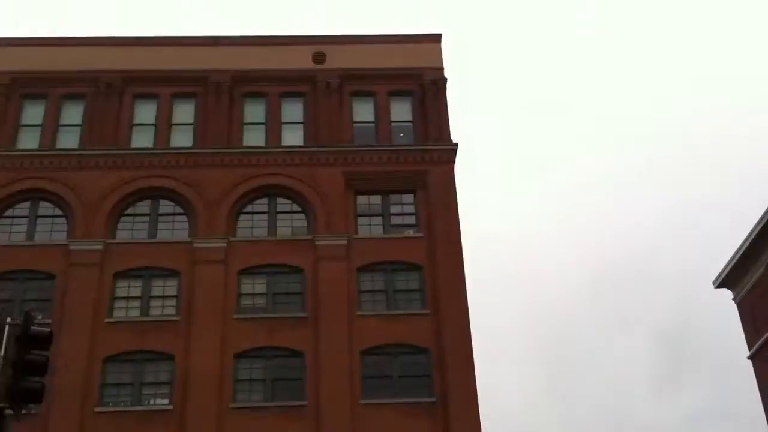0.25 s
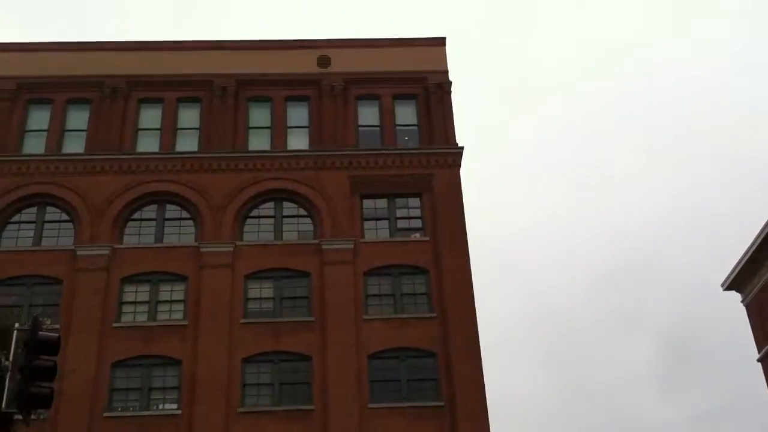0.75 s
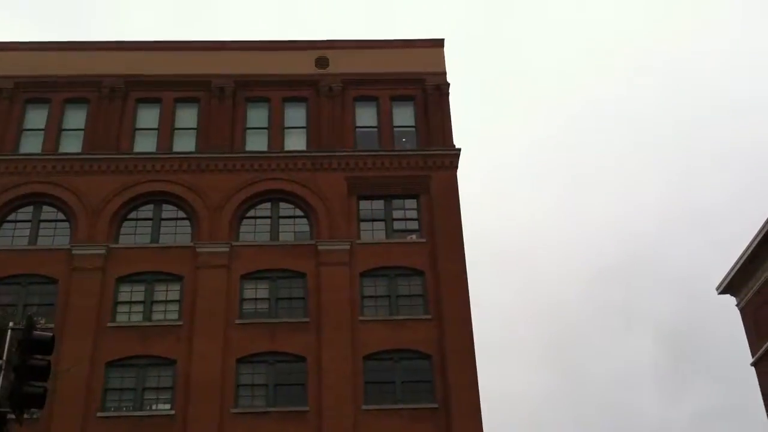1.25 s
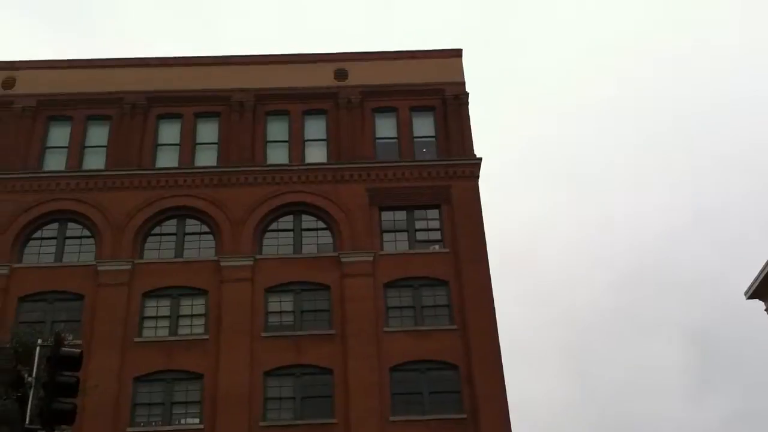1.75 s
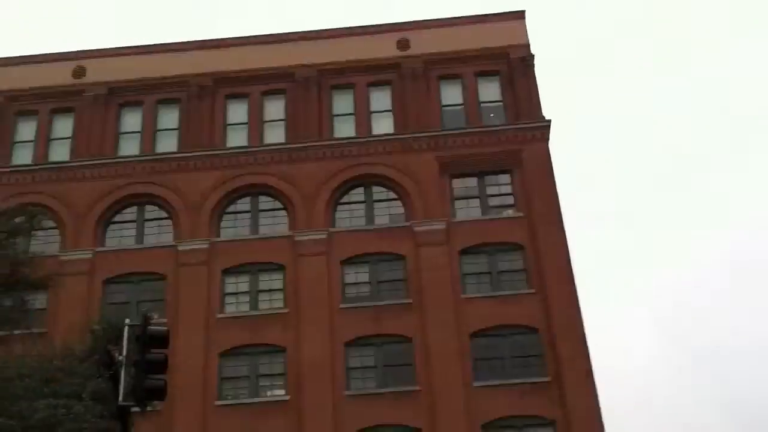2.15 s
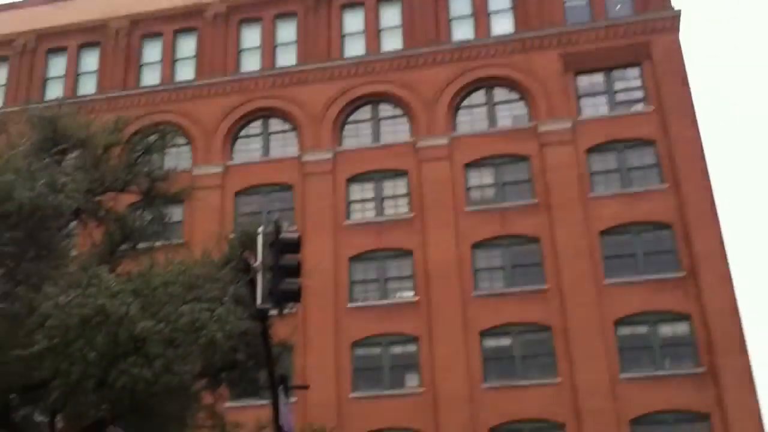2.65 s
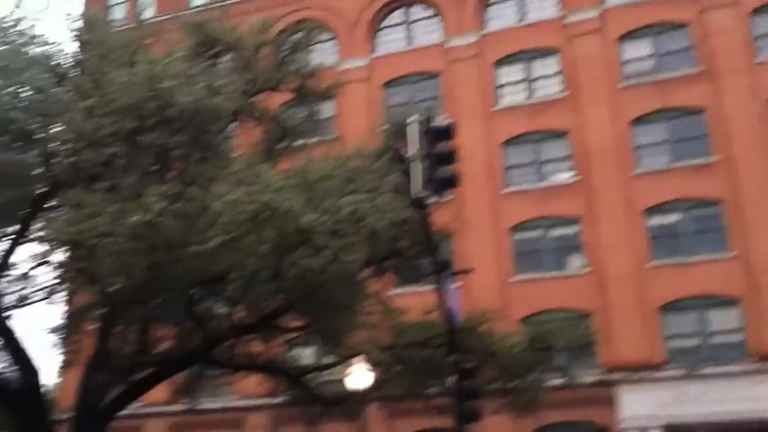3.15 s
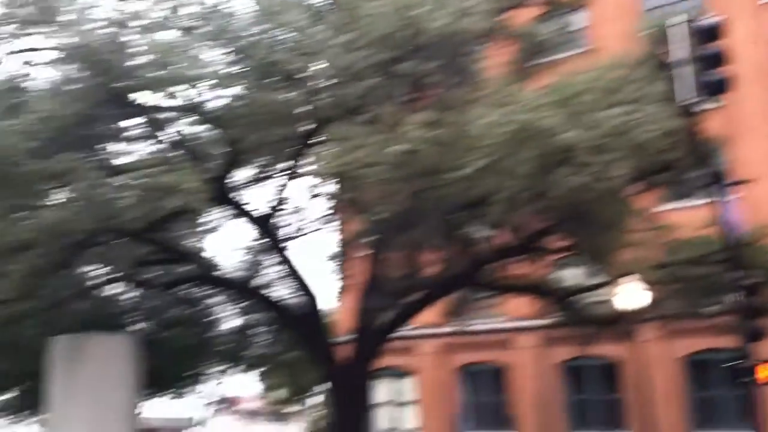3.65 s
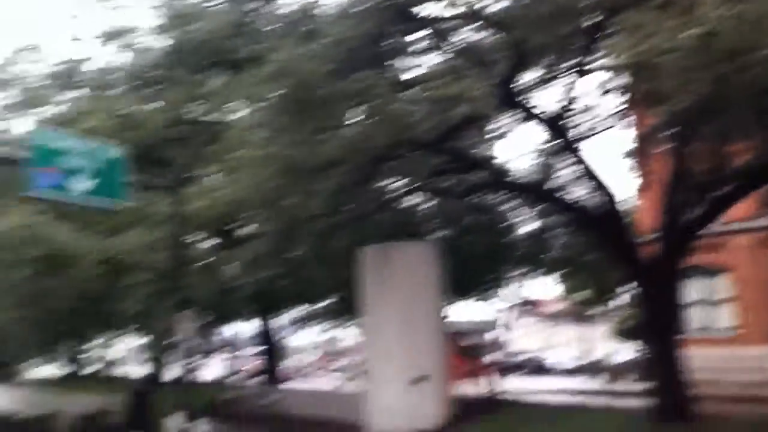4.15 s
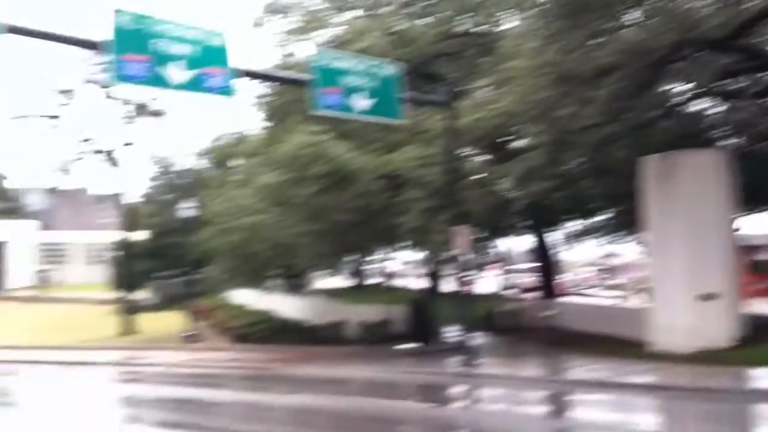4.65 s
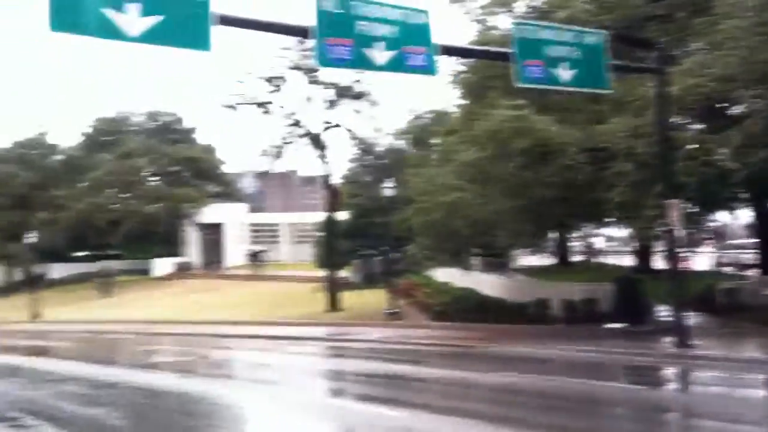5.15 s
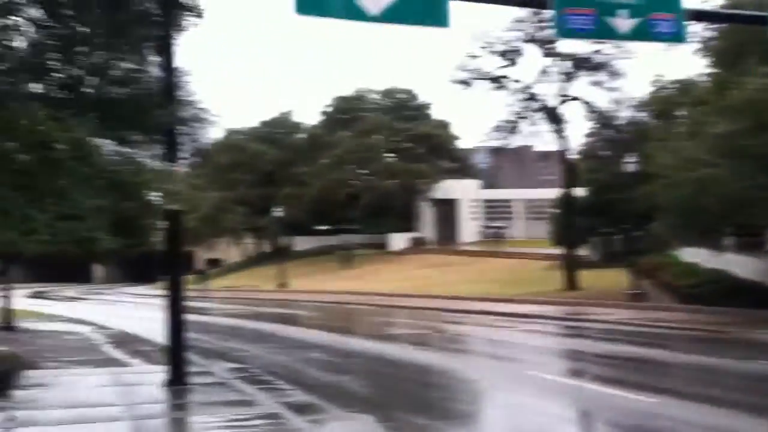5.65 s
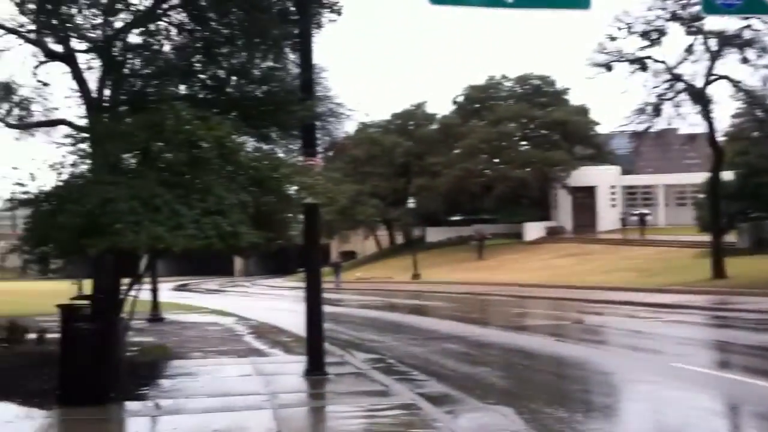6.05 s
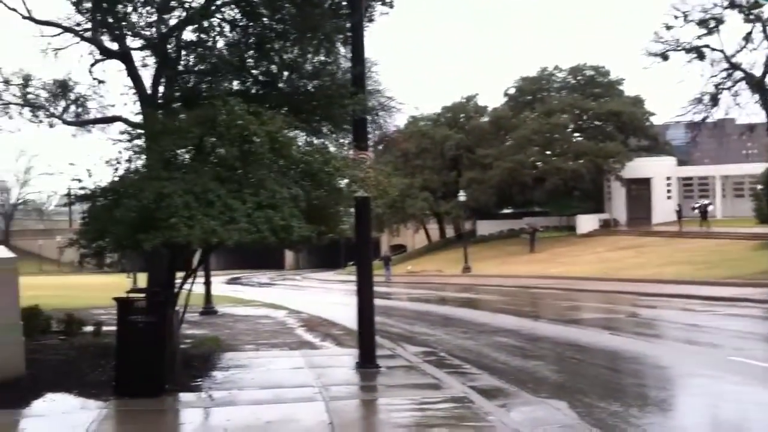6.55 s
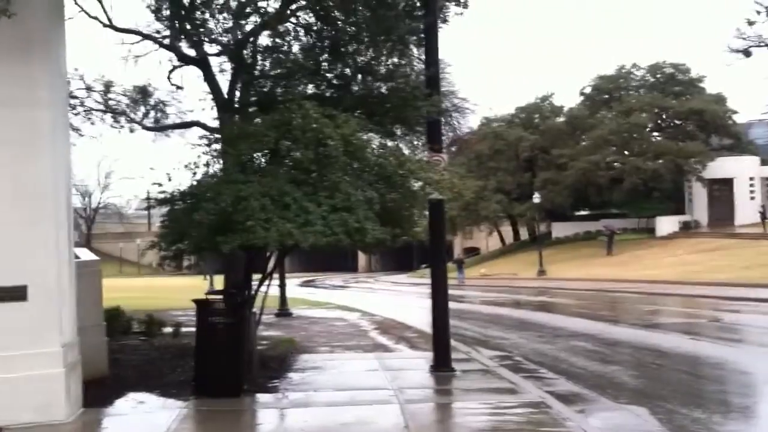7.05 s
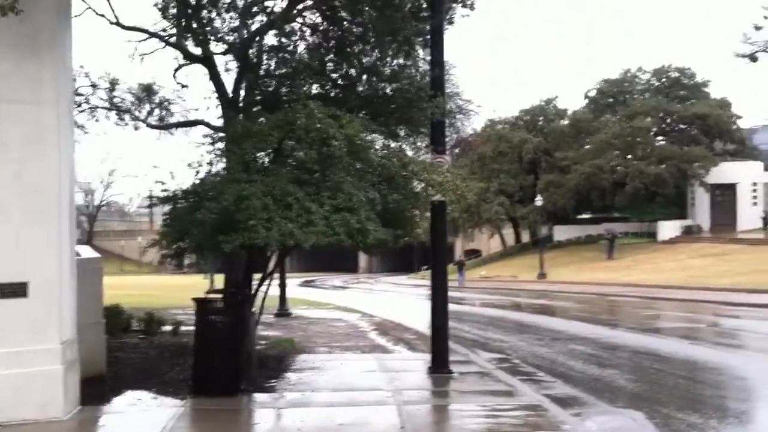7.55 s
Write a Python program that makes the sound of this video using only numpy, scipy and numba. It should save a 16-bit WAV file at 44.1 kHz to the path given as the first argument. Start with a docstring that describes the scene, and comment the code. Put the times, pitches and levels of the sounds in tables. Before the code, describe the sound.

A short loud thump and rush cut off dead, then steady wet-street traffic hisses, splashes grow, and a faint distant horn sounds near the end.

```python
"""A rain-wet city street, heard from the pavement after a short loud thump and rush that stop dead.
Engines rumble as low shaped noise; tyres roar, their tread notes sing, and the water film sizzles.
Spray, made of noise and tiny impacts, grows louder and brighter halfway, with small splashes.
A car draws nearer towards the end, and two horns, nearly pure tones, sound faintly far off."""
import sys
import numpy as np
from scipy import signal
from scipy.fft import rfft, irfft
from scipy.io import wavfile
from scipy.ndimage import uniform_filter1d
from numba import njit

SR = 44100
rng = np.random.default_rng(int(sys.argv[2]) if len(sys.argv) > 2 else 0)


def int16_out(signal):
    """Quantize to a 16-bit WAV file."""
    q = np.round(np.clip(np.atleast_2d(signal).T, -1, 1) * 32767)
    wavfile.write(sys.argv[1], SR, q.astype(np.int16))


N = 344421
TIME = np.arange(N) / SR  # seconds


def undb(db):
    """Decibels to gain."""
    return 10 ** (np.asarray(db) / 20)


def unit(x):
    """Scale to rms 1."""
    return x / np.sqrt(np.mean(x ** 2))


def curves(table):
    """The columns of a table, after its times, as controls with one value a sample."""
    s, *columns = np.transpose(table)
    return [np.interp(TIME, s, column) for column in columns]


def colour(x, spectrum):
    """Shape a sound with a spectrum that falls a steady 20 dB an octave beyond its ends; rms 1."""
    hz, db = np.transpose(spectrum)
    octave = np.log2(np.arange(N // 2 + 1) * SR / N + 1)
    points = np.log2(hz)
    outside = np.abs(octave - np.clip(octave, points[0], points[-1]))
    gain = undb(np.interp(octave, points, db) - 20 * outside)
    return unit(irfft(rfft(x) * gain, N))


def noise():
    """White noise."""
    return rng.standard_normal(N)


def walk(rate):
    """Random levels held 1 / rate s and smoothed; rms 1."""
    hold = int(SR / rate)
    steps = np.repeat(rng.standard_normal(N // hold + 1), hold)[:N]
    return unit(uniform_filter1d(steps, hold))


def droplets(per_s, spread_db):
    """Tiny impacts at random moments, most small and a few large; rms 1."""
    size = undb(spread_db * np.minimum(rng.exponential(size=N), 5))
    hit = rng.random(N) < per_s / SR
    return unit(hit * size * np.sign(noise()))


@njit
def resonance(x, hz, width):
    """State-variable band-pass whose centre moves."""
    y, band, low = np.empty(len(x)), 0., 0.
    for i in range(len(x)):
        g, k = np.tan(np.pi * hz[i] / SR), width / hz[i]
        v = (band + g * (x[i] - low)) / (1 + g * (g + k))
        band, low, y[i] = 2 * v - band, low + 2 * g * v, k * v
    return y


def tyres():
    """Rolling tyres roar; air pumped through the tread grooves rings in broad notes that wander apart."""
    # The stream of cars, slowly drawing nearer. Each row: time in seconds, roar in dB, tread note in dB.
    traffic = [(.15, -33, -38.5), (1.3, -33, -40), (1.9, -33.5, -36.5), (2.8, -32.5, -35), (3.1, -32, -38),
               (3.4, -33.5, -34.5), (3.85, -31.5, -35.8), (4.2, -32.2, -36.5), (4.7, -32, -37),
               (5.3, -32.5, -34.5), (5.9, -31.5, -34.5), (6.4, -32, -34), (7.35, -31.5, -36),
               (7.55, -31, -33.5), (7.73, -30, -32), (7.8, -30.5, -34)]
    # Spectrum of the roar. Each row: frequency in Hz, relative level in dB per Hz.
    roar_spectrum = [(200, -9), (380, -6.5), (550, -3), (780, 0), (1100, -1.5), (1550, -2.5), (2100, 0),
                     (2750, -5.5), (3200, -11), (4200, -42)]
    # The tread note, sinking overall. Each row: time in seconds, centre in Hz.
    tread_pitch = [(1.7, 2410), (4.0, 2170), (5.4, 2224), (7.8, 2190)]
    # Tyres of different sizes. Each row: share of the centre pitch, relative level in dB.
    tread_voices = [(.93, -5), (1, -4.5), (1.08, -5.5)]
    width_hz, wander_share, flicker_db = 570.0, .035, 1.6
    air_hz = 8500  # the tread note dies away above this

    roar_db, tread_db = curves(traffic)
    centre_hz = curves(tread_pitch)[0]
    roar = colour(noise(), roar_spectrum) * undb(roar_db + 0.35 * walk(18))
    air_filter = signal.butter(4, air_hz, fs=SR, output="sos")
    grooves = np.zeros(N)
    for share, db in tread_voices:
        hz = share * centre_hz * (1 + wander_share * walk(9))
        pumping = signal.sosfilt(air_filter, noise())
        note = resonance(resonance(pumping, hz, width_hz), hz, width_hz)
        grooves += unit(note) * undb(db + flicker_db * walk(13))
    return roar + grooves * undb(tread_db + tread_swells() + 0.34 * walk(20))


def tread_swells():
    """The tread note swells as single cars pass; dB."""
    # Each row: moment in seconds, swell in dB, half length in seconds (to 1/e of the swell).
    passes = [(.38, 2, .04), (.93, 4, 0.06), (1.09, 5, 0.066), (2.72, 0, 0.15), (3.998, 3.7, 0.071),
              (4.975, 3.5, 0.037), (5.39, 2, 0.09), (6.216, 2.5, 0.085), (6.683, 4, 0.069),
              (7.158, 3, .045), (7.73, 1.5, .06)]
    return sum(db * np.exp(-((TIME - s) / half) ** 2) for s, db, half in passes)


def engines():
    """Many engines and their echoes blur into one throbbing rumble of low noise."""
    # The rumble's uneven level, wavering by chance. Each row: time in seconds, rumble in dB.
    engine_level = [(.15, -41), (.95, -39), (1.15, -40.5), (1.6, -39), (2.45, -40.5), (2.7, -39),
                    (3.15, -40.3), (3.5, -38), (4.0, -39.5), (4.15, -41), (4.55, -38), (4.78, -43),
                    (4.98, -39.5), (6.4, -39.3), (6.6, -41.5), (6.8, -38.5), (7.8, -39)]
    # Spectrum of the rumble. Each row: frequency in Hz, relative level in dB per Hz.
    engine_spectrum = [(25, -31), (45, -35), (80, -21.5), (115, -9), (155, -1.5), (220, -1.5), (320, -5),
                       (450, -10.5), (800, -26.5)]
    level_db = curves(engine_level)[0]
    return colour(noise(), engine_spectrum) * undb(level_db + 0.25 * walk(6.5))


def water_film():
    """The tread squeezes the water film aside with a dense sizzle whose sharp edge drifts."""
    # The film under the tyres. Each row: time in seconds, sizzle in dB.
    film_level = [(.15, -42.5), (1.55, -40), (2.2, -41.5), (2.85, -41), (4.35, -44.5), (5.1, -41.5),
                  (5.65, -41.5), (6.1, -41.5), (6.7, -40.2), (7.65, -36), (7.8, -38)]
    # Spectrum of the sizzle. Each row: frequency in Hz, relative level in dB per Hz.
    film_spectrum = [(2200, -31), (2900, 2), (3500, 2.5), (4300, 1.5), (4850, -1.5), (5250, -13),
                     (6200, -32)]
    # The sharp edge sinks. Each row: time in seconds, centre in Hz, level in dB against the sizzle.
    sizzle_edge = [(1.2, 4570, -7), (4, 4450, -6.5), (7, 4100, -8)]
    width_hz, wander_share = 850.0, .04

    level_db = curves(film_level)[0]
    centre_hz, edge_db = curves(sizzle_edge)
    sizzle = colour(noise() + 0.53 * droplets(per_s=3000, spread_db=2.5), film_spectrum)
    hz = centre_hz * (1 + wander_share * walk(14))
    edge = resonance(colour(noise(), film_spectrum), hz, width_hz)
    edge = unit(resonance(edge, hz, width_hz))
    film = sizzle + edge * undb(edge_db + 2 * walk(13))
    return film * undb(level_db + 0.75 * walk(25))


def spray():
    """Mist hisses behind the wheels in shifting jets and flung drops patter; near, loud spray keeps more top."""
    # Swells behind each nearer car. Each row: time in seconds, hiss in dB.
    spray_level = [(.15, -47), (1.05, -46.5), (2.5, -48.8), (3.1, -49), (3.42, -45.5), (3.8, -48.5),
                   (4.08, -43.2), (4.35, -42), (4.47, -43), (4.68, -41), (4.93, -42.5), (5.05, -41),
                   (5.58, -43.5), (6.05, -37.5), (6.4, -40.5), (6.8, -40), (7.15, -41), (7.55, -40.5),
                   (7.8, -39.5)]
    # Spectrum of the mist. Each row: frequency in Hz, relative level in dB per Hz.
    spray_spectrum = [(4500, 2), (5400, -7), (6200, -1), (7200, 0.5), (8400, -1), (9600, -8),
                      (11000, -15.5), (12500, -26), (13600, -34), (14500, -60)]
    jet_hz, jet_width_hz, jet_wander_share, jet_flicker_db = 7600, 1700.0, .12, 1.6
    top_follow = 0.25  # extra dB at the very top per dB of spray

    level_db = curves(spray_level)[0]
    mist = colour(noise() + 0.82 * droplets(per_s=2200, spread_db=2.0), spray_spectrum)
    top = resonance(mist, np.full(N, 11500.), 4000.)
    near = undb(top_follow * (level_db - np.mean(level_db)))
    jets = resonance(mist, jet_hz * (1 + jet_wander_share * walk(11)), jet_width_hz)
    jet_gain = undb(jet_flicker_db * walk(16))
    patchy = mist + (near - 1) * top + (jet_gain - 1) * jets
    return patchy * undb(level_db + 0.5 * walk(24) + 0.34 * walk(7))


def splashes():
    """Each puddle throws up a quick, sputtering swell of drops that thins out a little more slowly."""
    # Tyres through puddles. Each row: peak in seconds, level in dB, rise in seconds, brightest pitch in Hz.
    puddles = [(1.415, -42, .014, 6000), (1.6, -39.5, 0.023, 4200), (2.757, -42.5, .011, 7200),
               (4.385, -43, .012, 8500), (4.57, -43, .008, 10000), (4.71, -43.5, .04, 7500),
               (4.778, -39, .009, 4600), (4.814, -38, .006, 9500), (5.087, -36, .006, 4800),
               (5.235, -43, .018, 8000), (5.435, -40, .021, 10000), (5.72, -38, 0.022, 8800),
               (6.17, -38.5, 0.026, 10500), (6.28, -41, .02, 9500), (6.403, -39.5, 0.011, 8500),
               (6.548, -37.8, 0.018, 9500), (6.61, -40, .018, 6000), (6.94, -41, 0.024, 7500),
               (7.08, -37, .004, 7500)]
    # Spectrum of splashed drops. Each row: frequency in Hz, relative level in dB per Hz.
    drop_spectrum = [(3500, -3), (4600, 9.5), (5400, -2.5), (6300, -1), (8400, -1), (9700, -12),
                     (11000, -17), (12600, -20), (13800, -36), (14600, -56)]
    fall_ratio = 1.9  # fall time as a multiple of the rise
    width_share = .8  # band width as a share of the brightest pitch
    sputter_db = 2.0  # uneven spurts

    out = np.zeros(N)
    drops = colour(noise() + droplets(per_s=2600, spread_db=4.0), drop_spectrum)
    for peak, db, rise, hz in puddles:
        side_s = np.where(TIME < peak, rise, rise * fall_ratio)
        swell = np.exp(-((TIME - peak) / side_s) ** 2)
        band = unit(resonance(drops, np.full(N, float(hz)), width_share * hz))
        out += undb(db) * swell * band
    return out * unit(undb(sputter_db * walk(170)))


def rush():
    """A loud rush of shaped noise over the thump; both stop dead with a tick and a tiny tail."""
    # The opening. Each row: time in seconds, low rumble in dB, hiss in dB, hollow ring in dB.
    rush_level = [(0, -17, -20.5, -20), (.012, -15, -20, -29), (.026, -25, -16.5, -12),
                  (.038, -24, -18, -27), (.05, -27, -18, -21), (.066, -35, -15.5, -32),
                  (.083, -30, -24, -30)]
    # Spectrum of the hiss. Each row: frequency in Hz, relative level in dB per Hz.
    rush_spectrum = [(130, -2), (250, -9), (600, -13), (850, -8.5), (1300, -6), (1750, -8), (2500, 1),
                     (2850, -2), (3400, -10.5), (4400, -9), (5200, -12), (7000, -18), (10000, -32),
                     (14000, -46)]
    end_s = .085
    snap_db, snap_s = -35, 0.00039  # the tick: level and half length
    tail_db, tail_s = -17, 0.0024  # what is left after the stop: level and decay time

    rumble_db, hiss_db, ring_db = curves(rush_level)
    snap = noise() * undb(snap_db) * np.exp(-((TIME - end_s) / snap_s) ** 2)
    tail = undb(tail_db) * np.exp(-np.abs(TIME - end_s) / tail_s)
    stop = np.where(TIME < end_s, 1, tail)
    hiss = colour(noise(), rush_spectrum) * undb(hiss_db)
    return (thump(rumble_db, ring_db) + hiss) * stop + snap


def thump(rumble_db, ring_db):
    """A short knock of decaying modes, and a hollow ring that sinks in pitch over a low rumble."""
    # Modes of the knock. Each row: frequency in Hz, level in dB, time to fall 60 dB in seconds.
    knock_modes = [(349, -24, 0.23), (480, -24, .06), (600, -30, .07), (710, -21.5, 0.058)]
    # Spectrum of the rumble. Each row: frequency in Hz, relative level in dB per Hz.
    thump_spectrum = [(40, -52), (85, -30), (125, -7), (190, -7), (240, 1), (350, -9), (500, -10),
                      (800, -18)]
    start_hz, end_hz, sink_s = 346, 198.7, 0.0199  # the ring's first and last pitch, settling time
    low_hz = 117  # the thump has no depth below this

    knock = sum(undb(db - 60 * TIME / t60) * np.sin(2 * np.pi * hz * TIME) for hz, db, t60 in knock_modes)
    ring_hz = end_hz + (start_hz - end_hz) * np.exp(-TIME / sink_s)
    ring = undb(ring_db) * np.sin(2 * np.pi * np.cumsum(ring_hz) / SR)
    rumble = colour(noise(), thump_spectrum) * undb(rumble_db)
    body = np.sqrt(2) * (knock + ring) + rumble
    return signal.sosfilt(signal.butter(4, low_hz, "high", fs=SR, output="sos"), body)


def horns():
    """Far horns keep little but their lowest partial, waver, and swell or sink towards their level."""
    # Each row: start in seconds, length in seconds, pitch in Hz, end level in dB,
    # swell in dB (negative sinks), pitch waver as a share.
    calls = [(6.165, 0.12, 450, -42, -4, .014), (6.9, .92, 627, -43, 15, 0.01003)]
    out = np.zeros(N)
    drift, flutter = walk(30), undb(2.5 * walk(14))
    for start, length, hz, db, swell_db, waver in calls:
        end = start + length
        left = np.clip((end - TIME) / length, 0, 1)
        gate = np.clip(np.minimum(TIME - start, end - TIME) / 0.039, 0, 1)  # 39 ms in and out
        phase = 2 * np.pi * np.cumsum(hz * (1 + waver * drift)) / SR
        tone = np.sin(phase) + undb(-18) * np.sin(2 * phase)
        out += np.sqrt(2) * undb(db - swell_db * left) * gate * tone
    return out * flutter


def scene():
    """The rush, a moment of near silence, then the street."""
    street_start_s, street_fade_s = 0.1, 0.033
    cars = tyres() + engines() + horns()
    water = water_film() + spray() + splashes()
    fade_in = np.clip((TIME - street_start_s) / street_fade_s, 0, 1) ** 1.65
    street = (cars + water) * np.maximum(fade_in, undb(-44))  # faintly there from the start
    return (rush() + street)[None]


def record(dry):
    """The recorder rounds the loudest peaks and cuts the top."""
    peak_limit, top_hz = .7, 15000
    rounded = dry / (1 + (dry / peak_limit) ** 8) ** (1 / 8)
    return signal.sosfilt(signal.ellip(8, .2, 70, top_hz, fs=SR, output="sos"), rounded)


dry = scene()
out = record(dry)
int16_out(out)
```